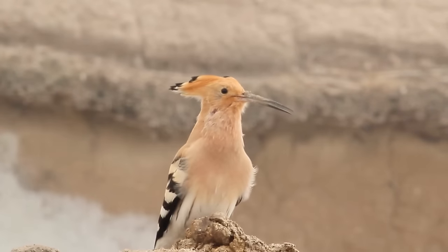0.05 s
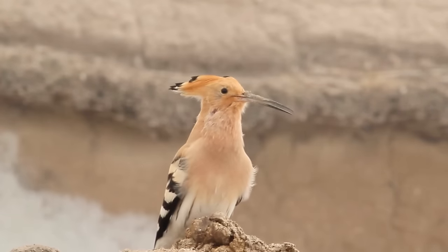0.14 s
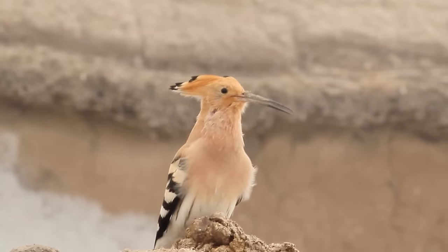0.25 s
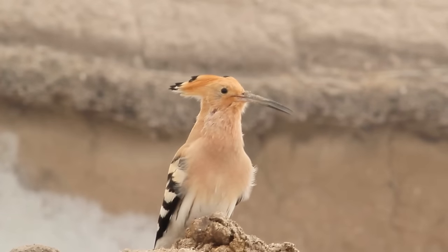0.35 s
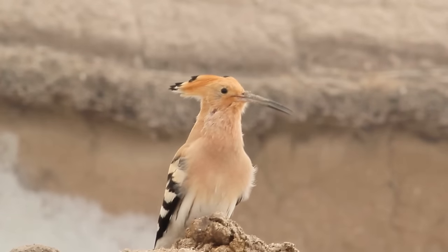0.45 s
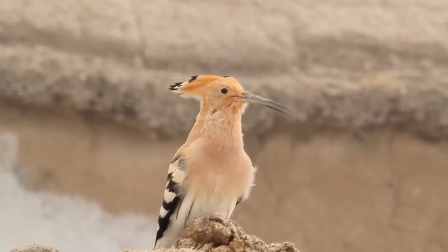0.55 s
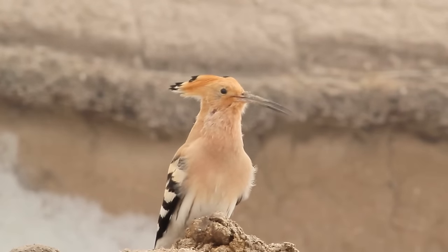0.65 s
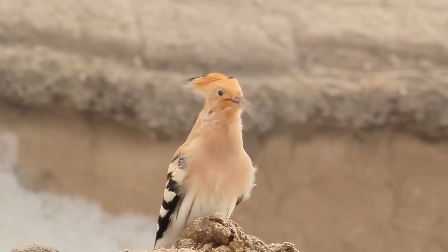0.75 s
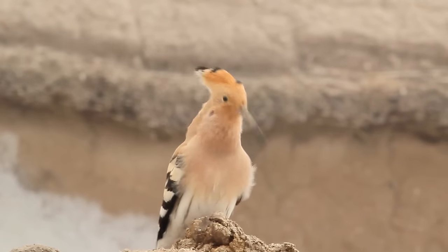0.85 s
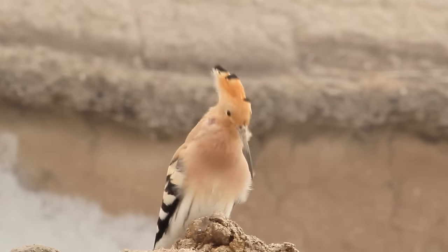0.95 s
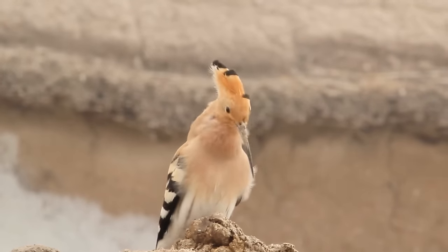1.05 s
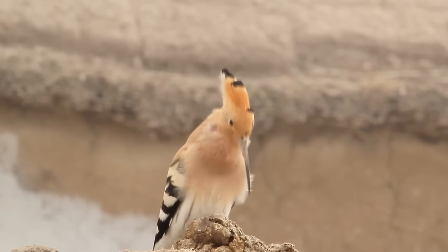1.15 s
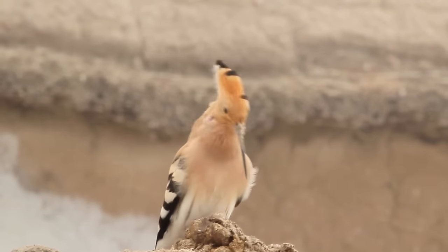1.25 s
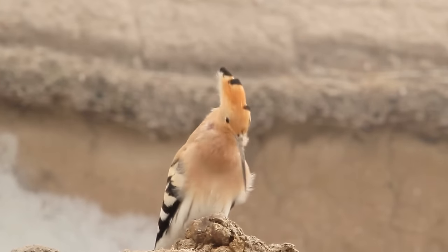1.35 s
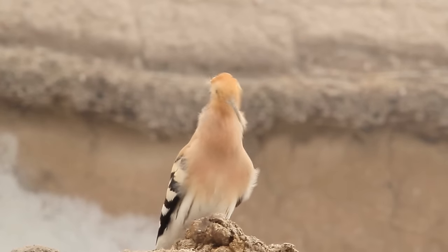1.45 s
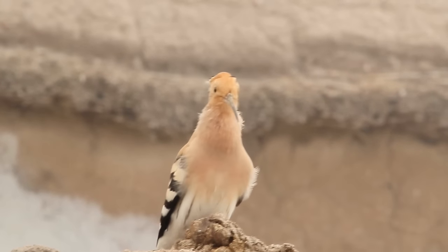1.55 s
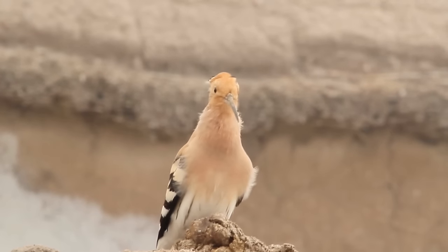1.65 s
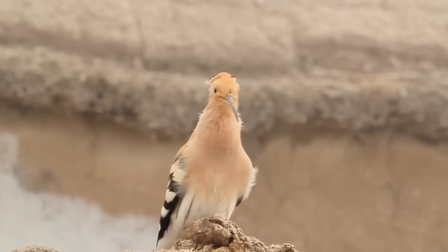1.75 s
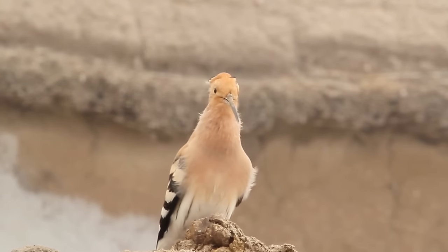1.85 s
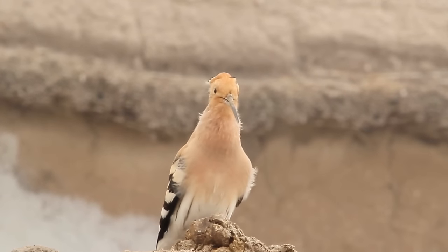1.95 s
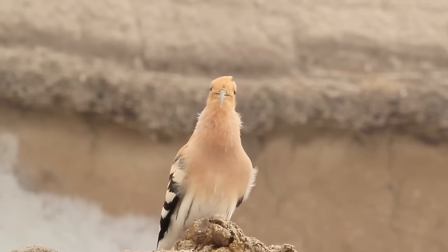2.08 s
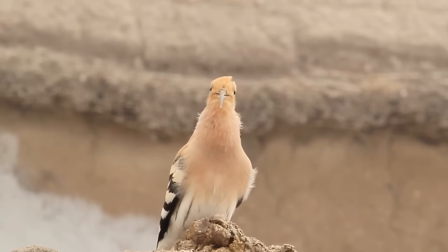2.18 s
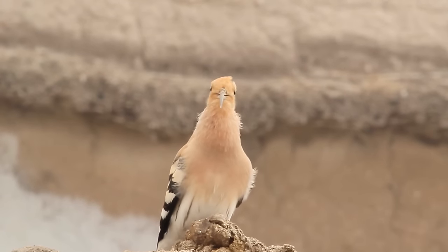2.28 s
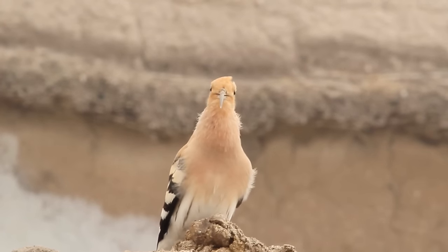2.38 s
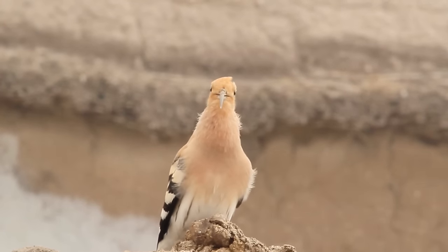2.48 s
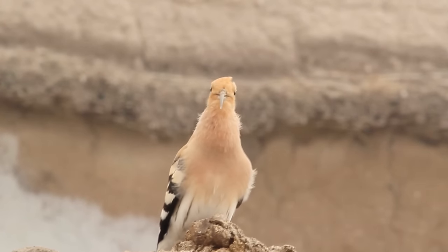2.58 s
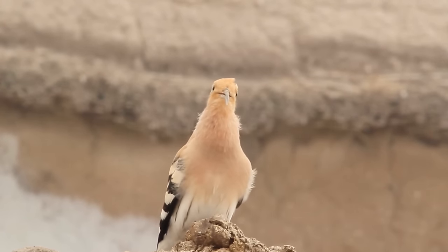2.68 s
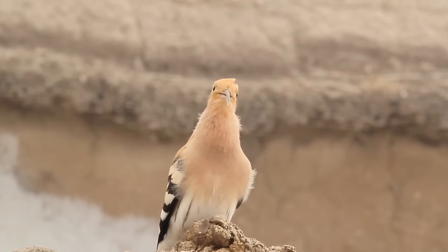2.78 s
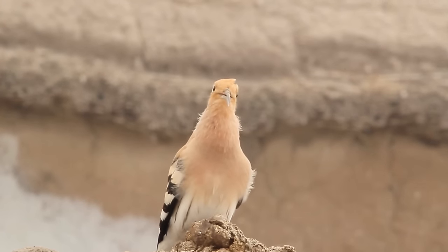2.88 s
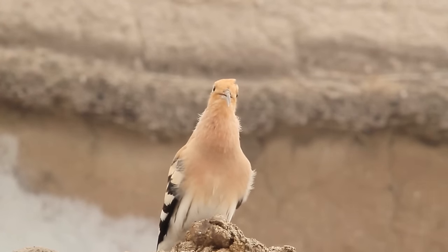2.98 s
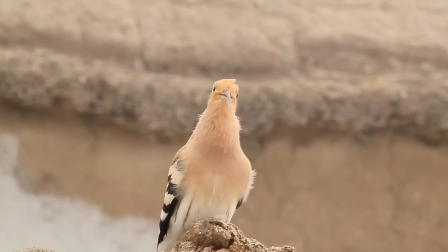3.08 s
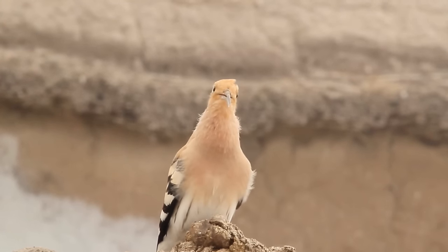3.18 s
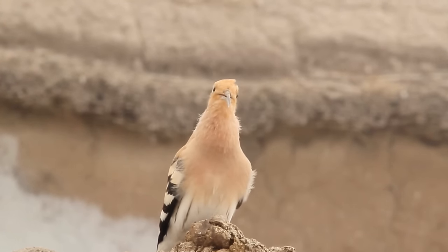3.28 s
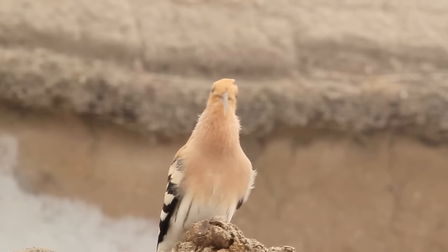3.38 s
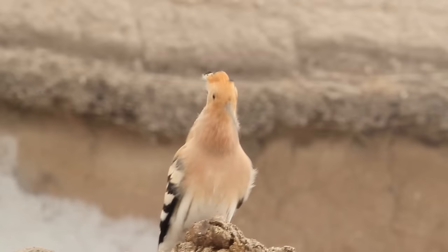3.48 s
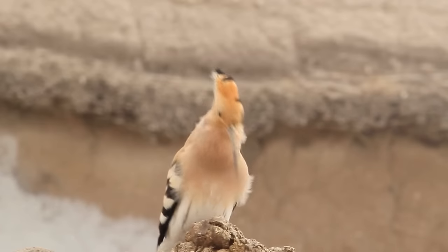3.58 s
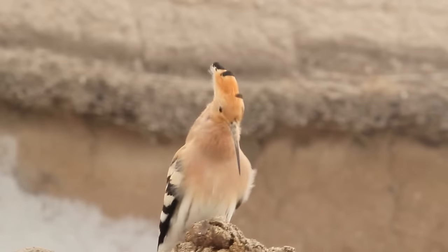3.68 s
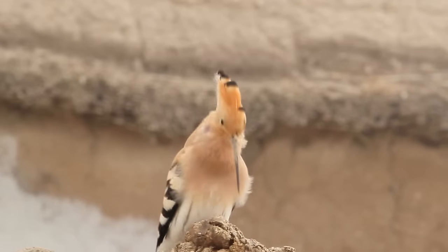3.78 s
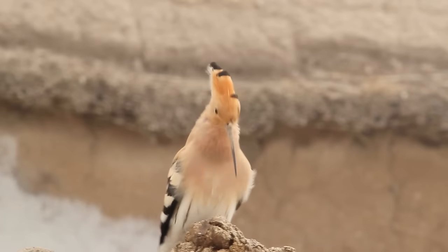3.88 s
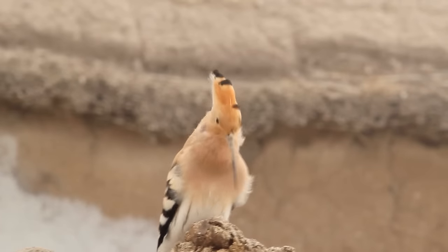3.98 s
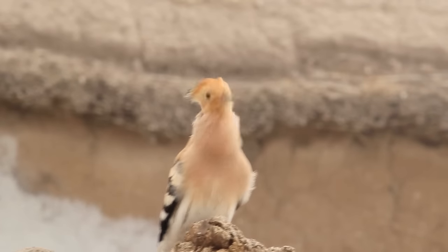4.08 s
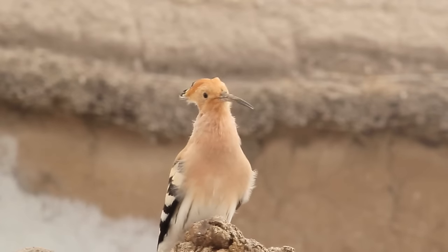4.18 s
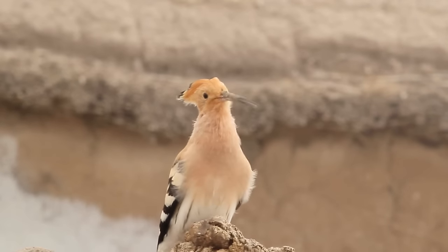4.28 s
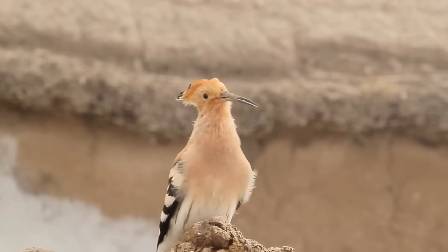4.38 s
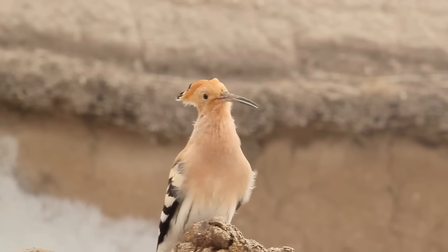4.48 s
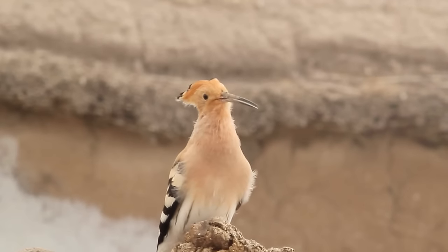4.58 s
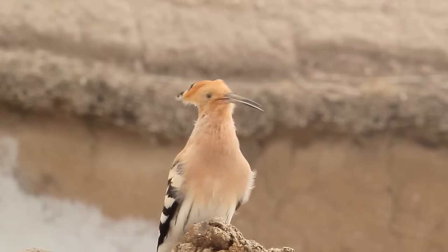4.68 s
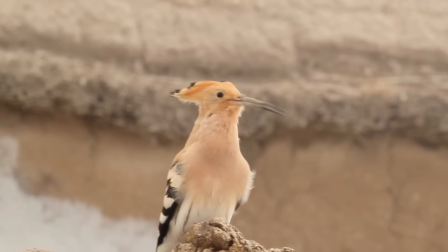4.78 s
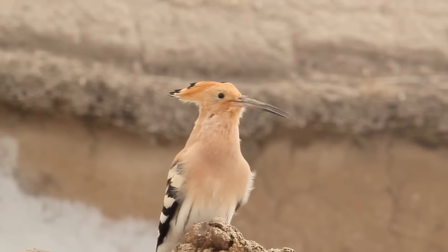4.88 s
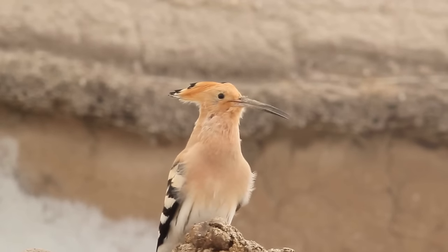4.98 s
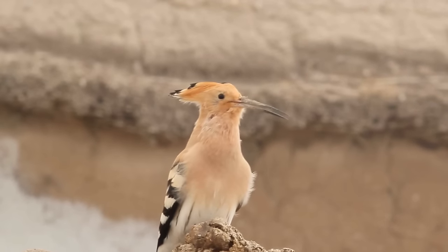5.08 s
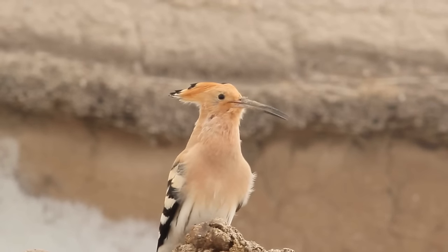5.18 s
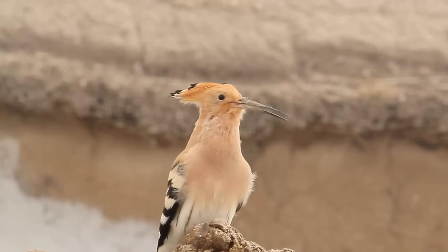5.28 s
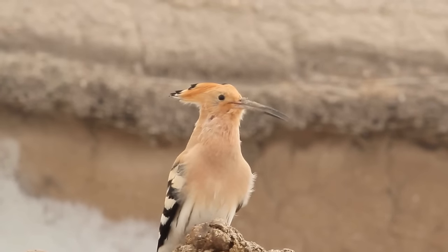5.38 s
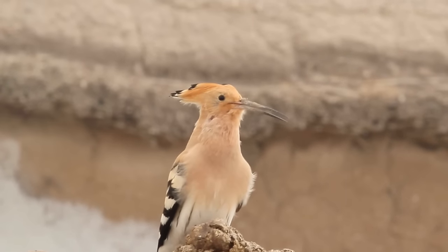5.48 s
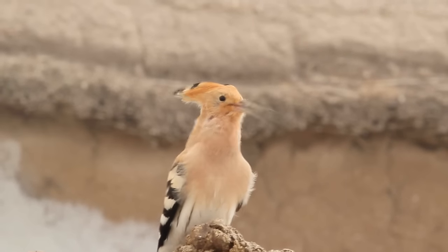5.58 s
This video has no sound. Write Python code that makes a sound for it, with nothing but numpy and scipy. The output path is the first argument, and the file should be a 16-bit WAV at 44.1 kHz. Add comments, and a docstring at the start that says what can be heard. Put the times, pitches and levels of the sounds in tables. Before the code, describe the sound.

Outdoors in a small walled yard, dense bright sparrow chatter surrounds a low, hollow three-note hoot, sounded twice with a pause between. Dry knocks on wood tick along slowly from just after one second, strongest around the second hooting. A far bird holds a faint thin note at times; a slight rustle rises at the end. The hoots are close and the air quiet.

```python
"""A hoopoe on a stump in a walled yard gives two soft triple hoots, nearly pure tones. Sparrows chirp and scold
all around, someone knocks on wood further off, and a far bird holds a thin note. The walls throw the hoopoe,
knocks and sparrows back twice; the yard adds a short tail over a faint outdoor rumble."""
import sys
import numpy as np
from scipy import signal
from scipy.fft import rfft, irfft, next_fast_len
from scipy.io import wavfile
from scipy.ndimage import uniform_filter1d, map_coordinates

SR = 44100
rng = np.random.default_rng(int(sys.argv[2]) if len(sys.argv) > 2 else 0)


def wav_out(sig):
    """Save sig, one row per channel (or a flat mono array), as 16-bit PCM at SR to the path in sys.argv[1]."""
    wavfile.write(sys.argv[1], SR, np.round(np.clip(np.atleast_2d(sig).T, -1, 1) * 32767).astype(np.int16))


N = 248724

# hoots: (s, length s, start pitch Hz, end pitch Hz, level dB)
HOOTS = [(0.934, 0.11, 577, 616, -27.5), (1.143, 0.098, 588.5, 609.7, -26.5), (1.339, 0.099, 589, 603.4, -26.5),
         (3.57, 0.12, 575, 616.4, -28), (3.781, 0.097, 584.3, 607, -26), (3.973, 0.1, 582, 605, -27)]
# knocks: (s, level dB)
KNOCKS = [(1.304, -14.5), (1.701, -11), (2.109, -9.5), (2.521, -11), (2.927, -9.5), (3.306, 5.5), (3.64, 7.5)]
# the struck wood: (Hz, dB, t60 s)
WOOD = [(385, -32.5, 0.016), (535, -46.5, 0.15), (840, -39.5, 0.1), (1061, -50, 0.034), (1117, -13, 0.0079), (1345, -33, 0.04), (1670, -22, 0.01), (2260, -50, 0.019), (2910, -41, 0.018)]
# the far bird: (s, length s, pitch Hz, level dB)
FAR_NOTES = [(-.1, 0.37, 791, -54), (2.5, 0.41, 789, -56.5), (3.936, 0.372, 793, -57.5)]
# echoes off the walls: (delay s, level dB)
WALLS = [(.0512, -14), (.088, -28)]
# outdoor background: (Hz, dB per Hz)
AIR = [(25, -13), (95, -9.5), (155, -1.5), (280, -2), (900, -5.5), (1700, -4.5), (3300, -5.5), (5200, -12), (9000, -18), (15500, -28)]
AIR_DB = -56.5
TOP_HZ = 15450  # fixed
# harsh scolding notes, all alike: (s, level dB)
SCOLDS = [(0.799, -41), (1.33, -46.5), (1.46, -46.5), (1.587, -44), (1.736, -42), (1.87, -44.5), (2.664, -48), (2.796, -45.5),
          (2.945, -45), (3.088, -46), (3.204, -44.5), (5.475, -46.5)]
# a dry rustle that rises near the end: (s, level dB)
RUSTLE = [(5.1, -70), (5.36, -57), (5.52, -52), (5.64, -52.5)]
# a faint passing drone: (s, pitch Hz, level dB)
DRONE = [(3.1, 50, -95), (3.22, 69, -72), (3.65, 91, -66.5), (4.2, 92, -83)]
# a whistle is led in by a thin high tone for this long (s)
LEAD_S = .035  # fixed
YARD_T60_S = 0.58
YARD_DB = -20  # fixed
EAVES_T60_S = .15  # fixed
# cheeps, three rounded arches stepping down: (s, length s, pitch Hz, level dB)
CHEEPS = [(1.545, 0.081, 4264, -36.5), (1.77, 0.084, 4406, -34.5), (2.044, 0.094, 4230, -37.5), (2.901, 0.095, 5355, -36.5), (3.405, 0.093, 4330, -44),
          (3.944, .09, 4694, -36.5), (4.512, .1, 5210, -34), (5.336, 0.1, 4380, -38.5)]
# slurs, one long arch: (s, length s, pitch Hz, fall octaves, level dB)
SLURS = [(-.02, 0.063, 5670, 0.58, -43), (0.105, 0.059, 4916, 0.33, -37), (0.286, 0.071, 3070, .3, -48.5), (0.369, 0.17, 3230, 0.41, -40), (0.373, 0.046, 4880, 0.06, -39),
         (0.418, 0.064, 4310, 0.18, -42), (0.708, 0.059, 5280, 0.08, -45.5), (0.773, 0.088, 5120, 0.67, -36.5), (1.311, 0.043, 3060, 0.09, -40.5), (1.386, 0.12, 4595, .5, -41.5),
         (2.357, 0.044, 5140, 0.01, -41.5), (2.396, .11, 5275, 0.5, -34), (2.511, .06, 4580, 0.24, -38.5), (2.577, 0.057, 3406, 0, -41), (3.28, 0.098, 3890, 0.65, -48.5),
         (3.595, 0.058, 5340, 0.43, -42.5), (3.652, 0.07, 3720, 0.7, -43.5), (3.83, .045, 3670, 0.02, -48), (4.328, 0.059, 3700, 0.13, -49), (5.03, 0.065, 5050, 0.2, -42.5)]
# shrill calls from under the eaves, all alike: (s, level dB)
SHRILLS = [(.067, -42.5), (.161, -46.5), (0.467, -47.5), (1.106, -45.5), (1.397, -46.5), (1.699, -43.5), (2.026, -41.5), (2.314, -42),
           (2.612, -43), (3.921, -43.5), (4.257, -48), (4.7, -42.5)]
# swoops, two pointed tips with a deep trough between: (s, level dB)
SWOOPS = [(0.657, -45.5), (.949, -45), (4.98, -41)]
SCOLD_S, SCOLD_HZ, SCOLD_THROAT_HZ = 0.0507, 638, 4180
# another bird's hoarse squawks: (s, pitch Hz, throat resonance Hz, level dB)
SQUAWKS = [(4.615, 1144, 1820, -53), (4.681, 1428, 2000, -48), (4.821, 1594, 2980, -44.5)]
SQUAWK_S = 0.049
# a sparrow's whistle is loudest near this pitch, and this much weaker an octave away
BEAK_HZ, BEAK_DB = 3660, -11
# a hoot starts softly, swells slowly and closes fast: lateness and fullness of its crest, level of its start (dB)
HOOT_LATE, HOOT_FULL, HOOT_START_DB = 1.48, 0.79, -14.5


def undb(db):
    """Decibels to gain."""
    return 10 ** (np.asarray(db) / 20)


def unit(x):
    """Scale to rms 1."""
    return x / np.sqrt(np.mean(x ** 2))


def add(out, s, sound):
    """Mix a sound in at time s."""
    start = int(s * SR)
    lo, hi = max(start, 0), min(start + len(sound), N)
    out[lo:hi] += sound[lo - start:hi - start]


def walk(size, rate):
    """Smooth random wander with spread near 1, turning rate times a second."""
    at = np.arange(size) * rate / SR
    return map_coordinates(rng.standard_normal(2048), [at], order=2, mode="wrap")


def turn(hz):
    """Phase of an oscillator that follows a pitch curve."""
    return 2 * np.pi * np.cumsum(hz) / SR


def colour(x, points):
    """Filter by a spectrum of (Hz, dB) points."""
    hz, db = np.transpose(points)
    size = next_fast_len(len(x))
    bins = np.maximum(np.arange(size // 2 + 1) * SR / size, 1)
    return irfft(rfft(x, size) * undb(np.interp(np.log(bins), np.log(hz), db)), size)[:len(x)]


def hoopoe(second_db=-26, third_db=-32, scoop=0.17, bend=1.61):
    """The inflated throat passes almost only the fundamental; each hoot scoops up and keeps rising."""
    out = np.zeros(N)
    for s, length, start_hz, end_hz, db in HOOTS:
        u = np.linspace(0, 1, int(length * SR))
        hz = (start_hz + (end_hz - start_hz) * u ** bend) * (1 - scoop * np.exp(-u / 0.039))
        phase = turn(hz * (1 + 0.00069 * walk(len(u), 134)))
        swell = undb(db) * np.maximum(np.abs(np.sin(np.pi * u ** HOOT_LATE)) ** HOOT_FULL, undb(HOOT_START_DB))
        # the octave grows as the pitch leaves the throat resonance
        tone = np.sin(phase) + undb(second_db + 35 * (u - 0.78)) * np.sin(2 * phase) + undb(third_db) * np.sin(3 * phase)
        add(out, s, np.sqrt(2) * swell * signal.windows.tukey(len(u), .14) * tone)
    return out


def chirp(hz, db, jitter, flutter_db=5, overtone_db=-23, second_voice_db=-12, second_stray=0.33, lead_db=-28, lead_hz=4900):
    """A gliding whistle; the other side of the syrinx starts first, high and thin, then strays across it."""
    hz, db = (np.pad(c, (int(LEAD_S * SR), 0), mode="edge") for c in (hz, db))
    t = np.arange(len(hz)) / SR - LEAD_S
    glide = uniform_filter1d(hz, size=160)
    loudness = undb(db + BEAK_DB * np.log2(glide / BEAK_HZ) ** 2)
    opening = np.clip(1 + t / 0.0019, 0, 1) ** 2
    first = opening * loudness * np.sin(turn(glide * (1 + jitter * walk(len(t), 597.2))))
    lead = np.exp(-(t / 0.023) ** 2)
    second_hz = (glide + (lead_hz - glide) * np.clip(.5 - t / 0.0199, 0, 1)) * np.exp(second_stray * np.tanh(walk(len(t), 70) - .5))
    second = (undb(second_voice_db) * loudness + undb(lead_db) * lead) * np.sin(turn(second_hz * (1 + jitter * walk(len(t), 595.7))))
    tone = first * undb(flutter_db * (np.tanh(walk(len(t), 150.5)) - 0.22)) + second * undb(5.5 * np.tanh(walk(len(t), 86)))
    # the two sides press on each other, which adds octaves and sum tones
    tone = tone + 2 * undb(overtone_db) * colour(tone ** 2 / np.maximum(loudness, .4), [(2500, -69), (5000, -1.5), (10000, -5.5), (14000, -2)])
    return np.sqrt(2) * tone * signal.windows.tukey(len(t), .1)


def sparrows(open_wet_db=-10, hidden_wet_db=-5, hidden_dry_db=0):
    """Birds in the open whistle cleanly and scold; those under the eaves are rougher and blurred."""
    clear, hidden = answers(), np.zeros(N)
    for s, length, hz, db in CHEEPS:
        add(clear, s - LEAD_S, undb(db) * cheep(length, hz))
    for s, length, hz, fall_oct, db in SLURS:
        add(clear, s - LEAD_S, undb(db) * slur(length, hz, fall_oct))
    for s, db in SWOOPS:
        add(clear, s - LEAD_S, undb(db) * swoop())
    for s, db in SHRILLS:
        add(hidden, s - LEAD_S, undb(db) * shrill())
    for s, db in SCOLDS:
        add(clear, s, undb(db) * scold(SCOLD_S, SCOLD_HZ, SCOLD_THROAT_HZ))
    for s, hz, throat_hz, db in SQUAWKS:
        add(clear, s, undb(db) * scold(SQUAWK_S, hz, throat_hz))
    blur = tail(undb(open_wet_db) * clear + undb(hidden_wet_db) * hidden, EAVES_T60_S, 0.0011)
    return clear + undb(hidden_dry_db) * hidden + blur


def flock(count=70, level_db=-61, spread_db=4, blur_t60=0.096, length=0.087, hz=4300, fall_oct=0.4):
    """More sparrows further off cheep and slur at random and arrive only by reflection."""
    out = np.zeros(N)
    for k, (when, slow, high, loud) in enumerate(rng.random((count, 4))):
        own_s, own_hz = length * 2 ** (slow - .5), hz * 2 ** ((high - .5) / 2)
        call = cheep(own_s, own_hz) if k % 2 else slur(own_s, own_hz, fall_oct)
        add(out, (k + when) / count * N / SR - LEAD_S, undb(level_db + spread_db * (2 * loud - 3.5)) * call)
    return tail(out, blur_t60, 0.00079)


def knocks(scatter_db=-4, scatter_t60=0.48, scatter_onset_s=0.0094, low_hz=260):
    """Blows on wood: a dead thock and a faint ring, scattered by things nearby."""
    out, t = np.zeros(N), np.arange(SR // 3) / SR
    ring = sum(undb(db - 60 * t / t60) * np.sin(2 * np.pi * hz * t) for hz, db, t60 in WOOD)
    ring *= 1 - np.exp(-(t / .001) ** 2)  # fixed
    for s, db in KNOCKS:
        add(out, s, undb(db) * ring)
    out = out + undb(scatter_db) * tail(out, scatter_t60, scatter_onset_s)
    # a small piece of wood radiates little bass
    return signal.sosfilt(signal.butter(2, low_hz, "high", fs=SR, output="sos"), out)


def far_bird(first_db=-11, third_db=-7):
    """A long level note, strongest at its octave, that sags at both ends."""
    out = np.zeros(N)
    for s, length, hz, db in FAR_NOTES:
        u = np.linspace(-1, 1, int(length * SR))
        phase = turn(hz * (1.005 - 0.0234 * u ** 2 + 0.01 * walk(len(u), 130.7)))
        tone = undb(first_db) * np.sin(phase) + np.sin(2 * phase) + undb(third_db) * np.sin(3 * phase)
        add(out, s, undb(db) * tone * signal.windows.tukey(len(u), .5))
    return out


def tail(x, t60, onset_s):
    """Diffuse reflections that build up and die away; unit energy."""
    t = np.arange(SR) / SR
    response = rng.standard_normal(SR) * undb(-60 * t / t60) * (1 - np.exp(-t / onset_s)) ** 2
    return signal.fftconvolve(x, response / np.linalg.norm(response))[:N]


def background(hum_hz=146, hum_db=-72, waver_db=1):
    """Faint rumble and hiss of the surroundings, a wavering hum, a passing drone and a rustle."""
    air = unit(colour(rng.standard_normal(N), AIR)) * undb(AIR_DB + waver_db * walk(N, 2.23))
    hum = np.sin(turn(hum_hz * (1 + .025 * walk(N, 38)))) * undb(hum_db + 2 * walk(N, 11))
    drone = np.sin(turn(curve(DRONE) * (1 + 0.011 * walk(N, 19)))) * undb(curve(DRONE, 2))
    rustle = unit(colour(rng.standard_normal(N), [(1000, -2.5), (5000, 1.5), (8000, -9.5), (15000, -22.5)]))
    return air + hum + drone + rustle * undb(curve(RUSTLE) + 1.3 * walk(N, 90))


def curve(rows, column=1):
    """One column of a table, joined by straight lines over the whole time."""
    rows = np.transpose(rows)
    return np.interp(np.arange(N) / SR, rows[0], rows[column])


def scold(length, pitch_hz, throat_hz, fall=0.35, droop=0.25, body_db=-9, body_hz=3150, jitter=0.026, rough_hz=1100, count=15):
    """A buzz rich in harmonics, hoarser when high; its pitch arches while the throat resonance slides down."""
    u = np.linspace(-1, 1, int(length * SR))
    hz = pitch_hz * (1 - 0.1277 * u ** 2 + jitter * walk(len(u), 565))
    phase, centre = turn(hz), throat_hz * np.exp(-fall * u - droop * u ** 2)
    out = 0
    for k in range(2 if pitch_hz < 1000 else 1, count):
        throat = np.exp(-(np.log(k * hz / centre) / .2) ** 2)  # fixed
        body = np.exp(-(np.log(k * hz / (body_hz * np.sqrt(centre / 4000))) / .76) ** 4)  # fixed
        out = out + (throat + undb(body_db) * body) * np.sin(k * phase + 2 * np.pi * rng.random() + pitch_hz / rough_hz * walk(len(u), 601))
    return unit(out * signal.windows.tukey(len(u), .4))


def arches(length, hz, fall_oct, swing_oct, lean, trough_db, count, hurry=1, narrow=1, fade_db=0):
    """Pitch and level of rounded arches that shorten on a falling line; the voice weakens in the troughs."""
    u = np.linspace(0, 1, int(length * SR), endpoint=False)
    trough = (1 - np.sin(np.pi * (count * u ** hurry % 1) ** lean)) ** narrow
    return hz * 2 ** (-fall_oct * u - swing_oct * trough), trough_db * trough + fade_db * u


def tips(length, hz, fall_oct, swing_oct, first_s, apart_s, fade_db):
    """Pitch and level of pointed tips on a falling line, the pitch sagging between them as the call fades."""
    t = np.arange(int(length * SR)) / SR
    sag = np.abs(np.sin(np.pi * (t - first_s) / apart_s))
    return hz * 2 ** (-fall_oct * t / length - swing_oct * sag), fade_db * t / length


def cheep(length, hz):
    """A quick zigzag down through three arches."""
    return chirp(*arches(length, hz, fall_oct=.64, swing_oct=0.47, lean=.85, trough_db=-11, count=3, hurry=1.06, narrow=1.4, fade_db=-3), jitter=0.015)


def slur(length, hz, fall_oct):
    """One arch that rises quickly and slides down."""
    return chirp(*arches(length, hz, fall_oct, swing_oct=0.5, lean=0.83, trough_db=-4.5, count=1), jitter=0.0188)


def shrill():
    """A rough call that flicks up high twice."""
    return chirp(*tips(length=.085, hz=6515, fall_oct=0.72, swing_oct=.44, first_s=.015, apart_s=.036, fade_db=-3.5), jitter=0.0227)


def swoop():
    """A call that dives an octave and flicks up again."""
    return chirp(*tips(length=.132, hz=5400, fall_oct=.86, swing_oct=.74, first_s=.025, apart_s=0.086, fade_db=-3.5), jitter=0.017)


def answers(below_db=-11, within_s=.06, length=.07, hz=3700, spread_oct=.65, fall_oct=.25, count=2):
    """Each slur sets off neighbours, who call across it more faintly at pitches of their own."""
    out = np.zeros(N)
    for (s, _, _, _, db), neighbours in zip(SLURS, rng.uniform(-1, 1, (len(SLURS), count, 2))):
        for when, high in neighbours:
            add(out, s + within_s * when - LEAD_S, undb(db + below_db) * slur(length, hz * 2 ** (spread_oct * high), fall_oct))
    return out


def scene(sparrow_echo_db=-6, sparrow_yard_db=-5, far_wet_db=-2):
    """The hoopoe is close, the sparrows all around; the walls echo the near sounds and the sparrows, and the
    yard echoes everything."""
    near, birds, far = hoopoe() + knocks(), sparrows() + flock(), far_bird()
    out = near + birds + far + undb(far_wet_db) * tail(far, YARD_T60_S, 0.0025)
    for delay, db in WALLS:
        add(out, delay, undb(db) * (near + undb(sparrow_echo_db) * birds))
    out += undb(YARD_DB) * tail(near + undb(sparrow_yard_db) * birds, YARD_T60_S, 0.037)
    return (out + background())[None]


def record(dry):
    """The recorder cuts the top."""
    return signal.sosfilt(signal.ellip(10, .2, 80, TOP_HZ, fs=SR, output="sos"), dry)


dry = scene()
out = record(dry)
wav_out(out)
```